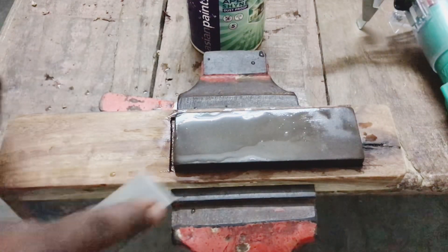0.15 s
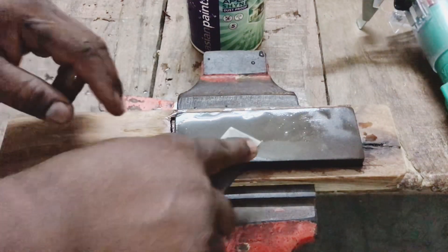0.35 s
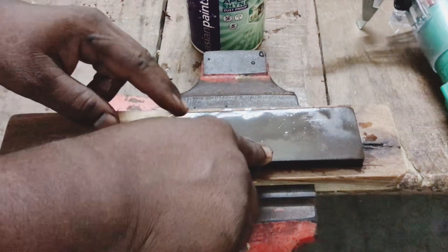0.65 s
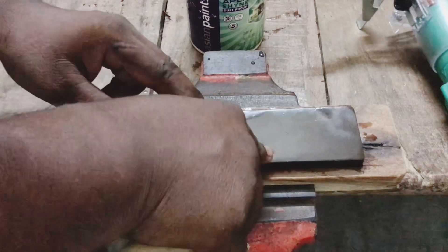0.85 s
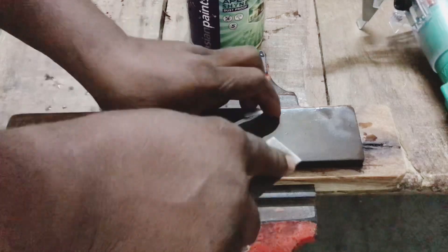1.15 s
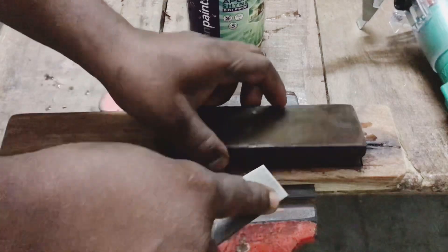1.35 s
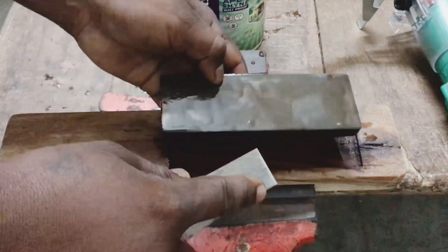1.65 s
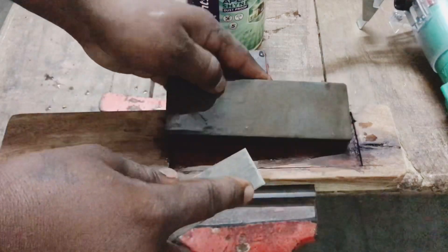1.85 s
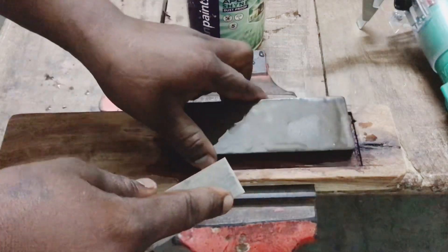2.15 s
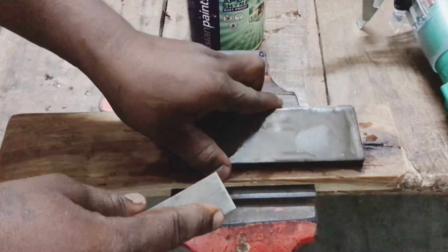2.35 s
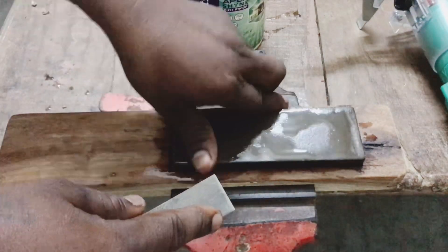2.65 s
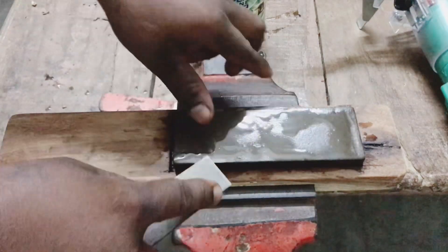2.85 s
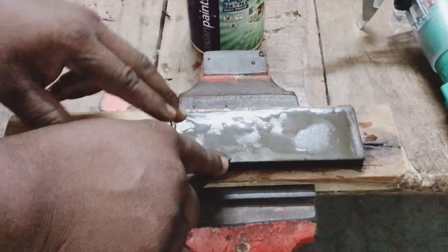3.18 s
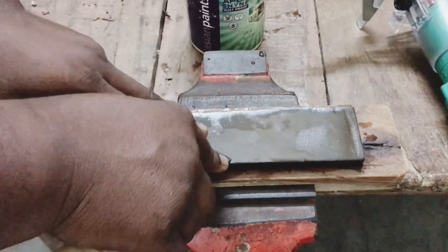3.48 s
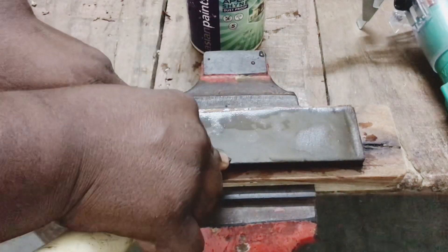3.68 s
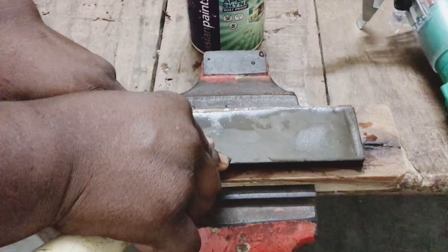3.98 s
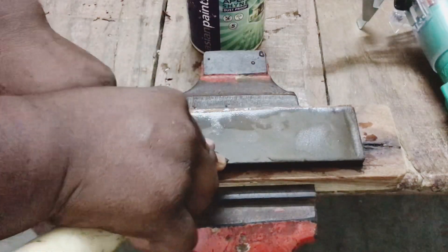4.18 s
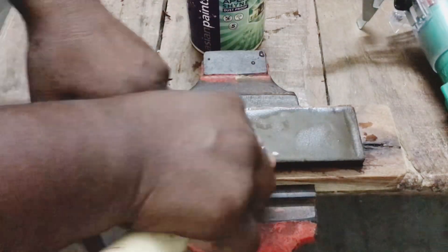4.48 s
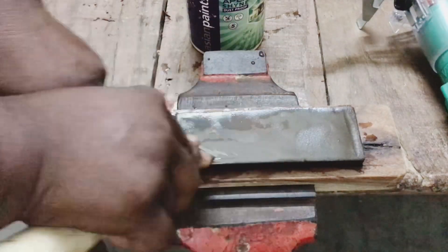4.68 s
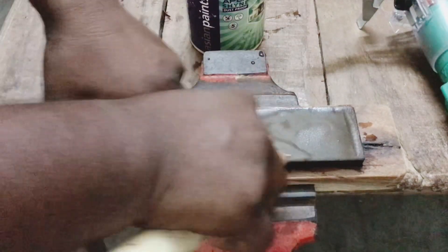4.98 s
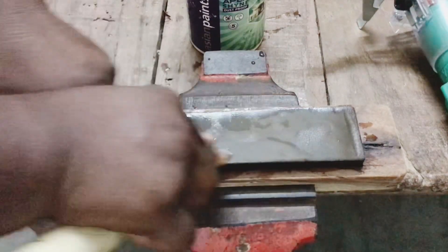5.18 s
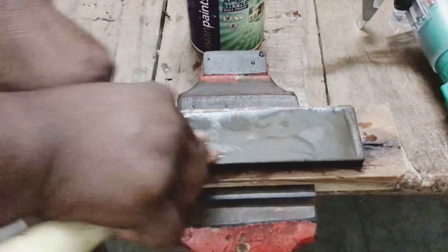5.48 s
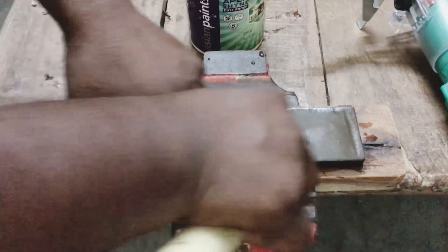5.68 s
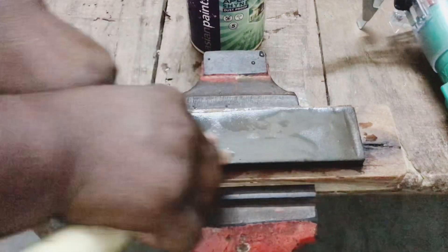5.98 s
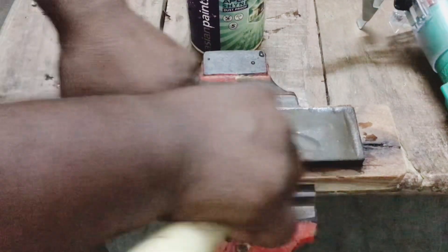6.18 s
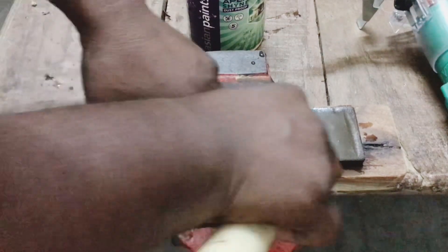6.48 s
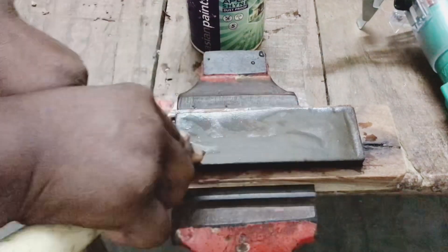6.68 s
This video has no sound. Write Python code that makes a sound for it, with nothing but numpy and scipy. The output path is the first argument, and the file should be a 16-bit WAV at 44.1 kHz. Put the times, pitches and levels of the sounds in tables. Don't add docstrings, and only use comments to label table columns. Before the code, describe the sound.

Wind gusts rumble and pop on a phone microphone while a stone knocks on its wooden holder, then a steel blade rasps in quick strokes.

```python
import sys
import numpy as np
from scipy import signal
from scipy.fft import rfft, irfft, next_fast_len
from scipy.io import wavfile
from scipy.ndimage import uniform_filter1d

SR = 44100
rng = np.random.default_rng(int(sys.argv[2]) if len(sys.argv) > 2 else 0)


def voltage_ratio(level):
    return 10 ** (np.asarray(level, float) / 20)


def bounce(signal):
    frames = np.transpose(np.atleast_2d(signal))
    limited = np.clip(frames, -1, 1)
    pcm = np.round(limited * 32767).astype(np.int16)
    wavfile.write(sys.argv[1], SR, pcm)


N = 301591

# start t/s, length t/s, rumble level/dB, sharper flutter level/dB
GUSTS = [(-.05, 0.15, -38.5, -45.5), (0.022, 0.22, -35, -39.5), (0.174, 0.27, -30.5, -35),
         (0.354, 0.12, -20.5, -33), (0.418, 0.16, -31.5, -42.5), (0.561, 0.17, -34, -57),
         (0.7, 0.25, -35, -35.5), (0.947, 0.25, -29, -37.5), (1.199, 0.21, -31.5, -43),
         (1.39, 0.26, -39, -50.5), (1.584, 0.36, -31, -38), (1.88, 0.27, -27, -31),
         (2.066, 0.28, -35.5, -54), (2.384, 0.33, -35.5, -39.5), (2.634, 0.31, -40, -50),
         (2.898, 0.11, -31.5, -40), (3.006, 0.26, -36.5, -49.5), (3.313, 0.4, -36.5, -56.5),
         (3.66, 0.17, -33.5, -40), (3.885, 0.26, -30.5, -43), (4.137, 0.43, -31, -38.5),
         (4.587, 0.19, -37, -42), (4.842, 0.22, -32, -43.5), (5.003, 0.5, -45, -53.5),
         (5.206, 0.2, -39, -45.5), (5.422, 0.29, -39, -41.5), (5.713, 0.45, -31.5, -39.5),
         (6.251, 0.28, -37.5, -39.5), (6.556, 0.21, -35.5, -65.5), (6.721, 0.15, -36, -48.5)]


def gusts(column, sag_db_s, calm_db):
    rise_s, fall_s = 0.051, 0.091
    t = np.arange(N) / SR
    speed = np.full(N, voltage_ratio(calm_db / 3))
    for start, length, *levels_db in GUSTS:
        db = levels_db[column]
        rise = min(rise_s, length / 2)
        hold = max(length - rise - fall_s, 1e-3)
        top, sagged = voltage_ratio(db / 3), voltage_ratio((db + sag_db_s * hold) / 3)
        times = [start, start + rise, start + min(rise + hold, length - .01), start + length]
        speed = np.maximum(speed, np.interp(t, times, [0, top, sagged, 0]))
    return speed ** 3


# t/s, peak level/dB, f/Hz
POPS = [(0.102, -11, 215), (0.2425, -18.5, 195), (.291, -17, 189), (0.398, -14, 312), (0.422, -16, 236),
        (0.475, -15, 167), (1.0065, -19.5, 195), (1.044, -11, 208), (1.276, -11, 220), (1.311, -17.5, 178),
        (1.934, -14.5, 175), (1.9678, -15.5, 144), (2.035, -15.5, 167), (2.4756, -12.5, 215),
        (2.501, -8.5, 213), (3.0678, -15, 146), (3.418, -20.5, 133.2), (3.725, -20, 174), (3.961, -18, 151),
        (4.189, -22, 208), (4.2525, -14.5, 212), (4.399, -17, 145), (4.95, -21.5, 187.4),
        (5.165, -23.5, 118), (5.3119, -23, 143), (5.535, -13.5, 155), (5.793, -15, 144), (5.853, -9.5, 160),
        (6.3062, -15, 260), (6.3485, -13.5, 196)]
# t/s, peak level/dB, f/Hz, number of cycles
WOBBLES = [(0.227, -23, 139, 1.7), (.412, -8.5, 253, 1.45), (0.7787, -18, 145, 1.74),
           (0.8334, -12, 148, 0.82), (0.9927, -17.5, 158, 1.1), (1.1009, -23.5, 149, 0.65),
           (1.455, -21, 134, 1.6), (1.6821, -11.5, 275, 1.22), (1.7746, -12, 154, 0.95),
           (1.999, -15.5, 179, 3.3), (2.462, -18.5, 154, 1.25), (2.4855, -12, 154, 1.77),
           (2.7073, -11.5, 188, 1.1), (3.1136, -21.5, 135, 1.46), (4.02, -23.5, 164.3, 1.36),
           (4.312, -18.5, 139.8, 1.1), (4.893, -18.5, 145, 1.1), (4.9335, -15, 225, 1.03),
           (2.482, -24, 395, 2.7), (6.303, -22, 329, 0.98), (6.335, -24.5, 270, 1.3),
           (3.548, -32, 255, 1.7), (6.317, -14, 147, 1.86), (3.33, -37, 150, 1.4), (3.398, -36, 197, 1),
           (3.507, -30, 128.3, 1.9), (3.772, -32.5, 230, 1.4), (2.414, -34.5, 197, 2.5)]
# t/s, peak level/dB, f/Hz
PUFFS = [(0.264, -26.5, 218), (0.314, -23, 177), (0.356, -28.5, 149), (0.502, -44, 129), (0.62, -31, 174),
         (0.803, -34, 219), (1.024, -22.5, 172), (1.057, -21.5, 185), (1.249, -37, 165),
         (1.263, -25.5, 163), (1.298, -24, 174), (1.624, -32, 187), (1.648, -35, 166), (1.67, -25, 156),
         (1.708, -22.5, 169), (1.791, -21, 161), (1.81, -24.5, 216), (1.828, -21, 177), (1.846, -25, 169),
         (1.861, -35, 188), (1.955, -19, 210), (1.986, -19, 165), (2.022, -33, 191), (2.048, -30, 145),
         (2.095, -24, 162), (2.196, -25.5, 123), (2.212, -28, 151.7), (2.242, -23, 134), (2.45, -22.5, 130),
         (2.547, -30.5, 143.3), (2.565, -24.5, 197), (2.602, -23.5, 217), (2.675, -24.5, 157),
         (2.766, -27, 167), (2.842, -25, 178), (2.919, -25, 240), (2.952, -25, 133), (3.093, -25.5, 140),
         (3.559, -29.5, 153.7), (3.701, -22, 175), (3.941, -29.5, 166), (3.98, -30, 137),
         (3.998, -31.5, 129), (4.204, -26, 193), (4.361, -25.5, 157), (4.383, -23, 116),
         (4.657, -23.5, 131), (4.678, -28, 145), (4.878, -24, 124), (4.917, -32, 165), (5.27, -25, 195),
         (5.571, -26.5, 170), (5.77, -32.5, 133), (5.823, -28, 177), (5.931, -26.5, 167), (5.959, -24, 218),
         (6.058, -27.5, 147), (6.374, -26.5, 179), (6.417, -25.5, 141.4), (6.784, -27, 148)]


def eddies():
    pops = [(*pop, 0.64) for pop in POPS]
    puffs = [(*puff, 1.124) for puff in PUFFS]
    whirls = [*pops, *WOBBLES, *puffs]
    out, t = np.zeros(N), np.arange(-1200, 1200) / SR
    for (s, db, hz, cycles), turn in zip(whirls, rng.standard_normal(len(whirls))):
        swell = np.exp(-4 * np.log(2) * (hz * t / cycles) ** 2)
        add(out, s + t[0], -voltage_ratio(db) * swell * np.cos(2 * np.pi * hz * t + 0.74 * turn))
    return out


# f/Hz, level/dB
RUMBLE_COLOUR = [(40, -38.5), (60, -18), (80, 3), (110, 4), (170, -3.5), (220, -10), (270, -15.5),
                 (330, -43)]
FLUTTER_COLOUR = [(180, -30), (240, 1.5), (300, 1), (380, -8.5), (470, -18.5), (560, -33)]
SWAY_COLOUR = [(15, 0), (40, -1), (55, -19.5)]
PORT_HISS_COLOUR = [(500, -21), (1500, -0.5), (3000, -2), (5000, -2.5), (7500, -2), (9000, -6.5),
                    (10000, -39.5)]


def wind():
    rumble = gusts(0, sag_db_s=-24, calm_db=-69)
    flutter = gusts(1, sag_db_s=-69.5, calm_db=-70)
    lumps_db = 7.1 * np.tanh(walk(40))
    out = rumble * voltage_ratio(-1.5 + lumps_db) * colour(rng.standard_normal(N), RUMBLE_COLOUR)
    flutter_db = -5.0 + lumps_db + 0.96 * walk(50)
    out += flutter * voltage_ratio(flutter_db) * colour(rng.standard_normal(N), FLUTTER_COLOUR)
    out += eddies()
    rush = uniform_filter1d(out ** 2, size=180) ** 0.61
    out = gate(highpass(out, 66), -61.0, -6.0)
    out += voltage_ratio(-32) * rumble * colour(rng.standard_normal(N), SWAY_COLOUR)
    return out + voltage_ratio(-40.5) * rush * colour(rng.standard_normal(N), PORT_HISS_COLOUR)


# start t/s, length t/s, f/Hz, level/dB
HOWLS = [(.089, 0.028, 554, -46.5), (.392, 0.061, 720, -50.5), (.404, 0.018, 1033, -53.5),
         (1.678, 0.018, 617, -39.5), (2.475, 0.029, 575, -39), (2.702, 0.015, 594, -63.5),
         (6.298, 0.027, 650, -46), (6.32, 0.052, 597, -52.5), (6.31, 0.066, 754, -59.5)]


def howls():
    return noisy_tones(HOWLS, width_hz=160)


# f/Hz, level/dB
CRACK_COLOUR = [(500, -29), (1500, 0), (6000, -1.5), (9500, -11), (10500, -34)]


def knocks(blows, body):
    modes, tail, tail_db, t60, longer, rise_ms = body
    out, t = np.zeros(N), np.arange(16384) / SR
    for s, db, contact_ms, gate_s, crack_db in blows:
        waver = rng.standard_normal((2, len(modes), len(t)))
        waver = uniform_filter1d(uniform_filter1d(waver, size=600), size=600)
        waver *= np.sqrt(600) * np.minimum(t / .03, 1)
        y = np.zeros(len(t))
        for (hz, mode_db, ring_s), level_waver, phase_waver in zip(modes, *waver):
            level_luck, pitch_luck = rng.standard_normal(2)
            phase = 2 * np.pi * hz * (1 + 0.00364 * pitch_luck) * t + phase_waver
            y += voltage_ratio(mode_db + 1.66 * level_luck + 2.8 * level_waver) * np.sin(phase) * 1000 ** (-t / ring_s)
        y = y * (0.67 + 0.87 * np.exp(-t / 0.0063)) / np.max(np.abs(y))
        y /= 1 + np.exp((t - longer * gate_s) / 0.014)
        noise = colour(rng.standard_normal(len(t)), tail)
        dull = uniform_filter1d(noise, size=9)
        echoes = dull * 1000 ** (-t / t60) + (noise - dull) * 1000 ** (-t / (1.35 * t60))
        y += voltage_ratio(tail_db) * echoes / (1 + np.exp((t - gate_s) / 0.0066))
        y += voltage_ratio(0.5) * noise * np.exp(-t / 0.003)
        y *= 1 - np.exp(-(t * 1000 / rise_ms) ** 2)
        crack = colour(rng.standard_normal(len(t)), CRACK_COLOUR)
        y += voltage_ratio(crack_db) * crack * np.exp(-t / 0.00059)
        y = highpass(y, tail[0][0])
        soft = np.exp(-1 / (contact_ms * SR / 1000))
        add(out, s, voltage_ratio(db) * signal.lfilter([1 - soft], [1, -soft], y))
        smear = noise[-1000:] * np.exp(-t[1000:0:-1] / .005)
        add(out, s - 1000 / SR, voltage_ratio(db + tail_db - 10) * smear)
    return out


# t/s, peak level/dB, contact t/ms, gate closes after t/s, crack level/dB
DROP = [
    (1.782, -40, 0.15, 0.026, -40),
    (1.7986, -10.5, 0.074, 0.15, -4),
]
SEAT = [
    (2.132, -17, 0.065, 0.046, -32.5),
    (2.143, -16, 0.037, 0.24, -15),
    (2.198, -22, 0.024, 0.19, -25),
    (2.306, -13, 0.074, 0.11, -28),
    (2.320, -15, 0.073, 0.16, -19),
]
# modes (f/Hz, level/dB, time to fall 60 dB t/s), colour of the room tail (f/Hz, level/dB),
# tail level/dB, tail time to fall 60 dB t/s, how much longer the gate passes the modes, rise t/ms
DROP_BODY = ([(480, -8, 0.41), (581, -12, 0.46), (780, -14, 0.65), (714, -0.5, 0.58), (1070, -20.5, 0.45),
             (1127, -7.5, 0.2), (1272, -10, 0.31), (1496, -16, 0.29), (1740, -10.5, 0.51), (1852, -16, .35),
             (3900, -14.5, 0.2), (2680, -21, 0.47), (3010, -6, 0.28), (5250, -12.5, 0.14)], [(330, -48),
             (450, -12), (710, -8.5), (920, -16), (1700, -11), (2800, -23), (3800, -24), (8900, -29),
             (10500, -64)], -14.5, 0.43, 1.9, 0.17)
SEAT_BODY = ([(501, -7.5, 0.3), (688, -3, 0.6), (738, -5, 0.85), (1000, -7.5, .2), (1165, -4, 0.21),
             (1515, -7, 0.33), (1286, -9.5, .18), (1418, -3, 0.32), (1600, -7.5, 0.2), (1752, 3, 0.5),
             (1920, 0.5, 0.22), (2130, -13.5, 0.2), (2230, -6, 0.25), (2425, -17.5, 0.25)], [(380, -40),
             (480, -10.5), (720, -4.5), (900, -20), (1750, 2.5), (2450, -11), (2750, -25), (9300, -24.5),
             (10500, -84.5)], -15.5, 0.31, 1.8, .7)


def stone_on_holder():
    return knocks(DROP, DROP_BODY) + knocks(SEAT, SEAT_BODY)


# t/s, peak level/dB, contact t/ms, gate closes after t/s, crack level/dB
TAP_FIRST = [
    (.674, -49, .1, .02, -50),
    (.688, -29.5, 0.089, 0.11, -42),
]
TAP_SECOND = [
    (3.255, -46, 0.12, 0.018, -50),
    (3.2649, -29.5, 0.033, 0.084, -10),
]
TAP_FIRST_BODY = ([(1114, 5.5, 0.32), (1304, -2, .18), (3220, -5, 0.3), (3300, -11.5, 0.25),
                  (3550, -8.5, .2), (4800, -12, .22), (4790, -13, 0.2), (1190, -13, 0.1)], [(900, -54),
                  (1110, 3.5), (1330, -2), (1600, -53), (2970, -32), (3320, -9.5), (3760, -33), (8100, -25),
                  (10500, -75)], -5, 0.13, 1.15, 2)
TAP_SECOND_BODY = ([(1136, 7.5, 0.15), (1440, -5, 0.086), (3190, -7.5, 0.52), (3510, -6, .6),
                   (3730, -8, 0.35), (3830, -6, .3), (4300, -12, 0.5), (4600, -7.5, .2), (5146, -19, .12),
                   (6070, -7, 0.42), (6900, -5, .4), (7030, -5, 0.2), (9460, -15, 0.2)], [(900, -53),
                   (1080, -4.5), (1280, -22.5), (2650, -27.5), (3400, -4), (4050, -12), (4600, -9),
                   (5300, -9.5), (7000, -13), (8000, -25.5), (9190, -13.5), (10500, -43)],
                   -11.5, 0.27, 1.35, 0.41)


def chisel_taps():
    return knocks(TAP_FIRST, TAP_FIRST_BODY) + knocks(TAP_SECOND, TAP_SECOND_BODY)


# start t/s,
# length t/s, f/Hz, level/dB
AFTER_RINGS = [(.345, 0.042, 3940, -72.5), (1.94, 0.074, 865, -50.5), (1.95, 0.078, 610, -45),
               (2.14, 0.097, 2990, -52.5), (2.192, 0.017, 2350, -46), (2.21, 0.078, 2320, -49.5),
               (2.37, 0.073, 2330, -57.5), (3.33, 0.076, 4500, -80), (3.36, 0.053, 3410, -77)]


def after_rings():
    return noisy_tones(AFTER_RINGS, width_hz=210)


# bite t/s, halt t/s, gate shuts t/s
STROKES = [(4.44, 4.575, 4.635), (4.66, 4.78, 4.84), (4.86, 4.98, 5.003), (5.064, 5.175, 5.24),
           (5.255, 5.385, 5.405), (5.47, 5.585, 5.6), (5.66, 5.79, 5.805), (5.885, 5.98, 5.994),
           (6.06, 6.165, 6.192), (6.275, 6.37, 6.39), (6.44, 6.558, 6.576), (6.663, 6.752, 6.768)]
# at bite level/dB, midway level/dB, at halt level/dB
PRESSURE = [(-43.5, -40, -42), (-44, -40, -40.5), (-37.5, -38, -42.5), (-43, -38, -41), (-38.5, -36, -41),
            (-45, -39, -42), (-41.5, -39.5, -43), (-45.5, -40.5, -45.5), (-45, -41.5, -45.5),
            (-46, -46, -45.5), (-46, -40.5, -42), (-46, -43.5, -48.5)]
# low mode level/dB, high shoulders level/dB
GRIP = [(1.5, -3.5), (0.5, -1.5), (2.5, -3), (1.5, 0), (-2, -8), (4.5, 0.5), (-6, -2), (-14.5, 3), (-12, 0),
        (0, -0.5), (-6.5, 0), (2, 3)]
# f/Hz, width f/Hz, level/dB, gain along a pull level/dB, along a push level/dB,
# share of the grip's low mode, share of its shoulders
BLADE = [(6130, 520, -15.5, 3, 4.5, 0.93, 0), (6570, 500, -9.5, 1.5, -1.5, 0, 0.064),
         (6860, 400, -10, -2, 0, 0, 0.062), (7250, 450, -14, -4.5, 5, 0.091, 1),
         (8000, 900, -25.5, -1, 9, 0.48, 0.051), (8730, 400, -18, -4.5, 1, 0.05, 0.99),
         (9194, 640, -13, 0.5, -0.5, 0, 0.084), (9730, 740, -23, 2.5, 1, 0.24, 0)]
# t/s, gain level/dB
CATCHES = [(4.483, 2.5), (4.51, 3), (4.558, 6), (4.685, 3.5), (4.701, 5), (4.727, 4.5), (4.742, 6),
           (4.755, 5.5), (4.944, 6), (5.265, 8), (5.276, 5.5), (5.311, 5.5), (5.319, 4.5), (5.557, 7),
           (5.664, 3.5), (5.719, 1.5), (5.732, 5), (5.916, 4), (6.068, 4.5), (6.113, 5.5), (6.147, 4.5),
           (6.275, 5.5), (6.466, 6), (6.512, 6), (6.682, 9)]
# f/Hz, level/dB
SCRAPE_COLOUR = [(350, -24.5), (500, -9.5), (1400, -9), (3400, -9.5), (5500, -10), (8000, -32.5),
                 (10000, -34.5), (10600, -52)]


def strokes():
    t, ringing, scraping = np.arange(N) / SR, np.zeros(N), np.zeros(N)
    for (bite, halt, shut), (bite_db, mid_db, halt_db) in zip(STROKES, PRESSURE):
        times = [bite - .06, bite - .012, bite, (bite + halt) / 2, halt,
                 min(halt + .018, shut - 2e-3), shut, shut + .013]
        levels_db = [-92, bite_db - 13.0, bite_db, mid_db, halt_db, halt_db - 11, halt_db - 16.5, -80]
        press = voltage_ratio(np.interp(t, times, levels_db, -120, -120))
        ringing += press
        scraping += voltage_ratio(-19.5) * press * np.clip((halt + 0.12 - t) / 0.025, 0, 1)
    catch_s = 0.00093
    catch_db = sum(db * np.exp(-((t - s) / catch_s) ** 2 / 2) for s, db in CATCHES)
    grains = rng.standard_normal(N) * voltage_ratio(1.8 * walk(400) + 0.5 * walk(70) + 1.4 * catch_db)
    ends = np.array(STROKES)[:, :2].ravel()
    pull = np.interp(t, ends, np.tile([-.5, .5, 0, 0], len(STROKES) // 2))
    push = np.interp(t, ends, np.tile([0, 0, -.5, .5], len(STROKES) // 2))
    low_db, shoulder_db = [np.interp(t, ends, np.repeat(db, 2)) for db in np.transpose(GRIP)]
    blade = np.zeros(N)
    for hz, width, db, pull_db, push_db, low, shoulder in BLADE:
        mode_db = db + pull_db * pull + push_db * push + low * low_db + shoulder * shoulder_db
        blade += voltage_ratio(mode_db + 1.5 * walk(10)) * ring(grains, [(hz, width, 0)])
    return gate(ringing * blade, -64.5, -6.0) + scraping * colour(grains, SCRAPE_COLOUR)


# t/s, peak level/dB
GRIT = [(5.23, -47), (5.275, -37), (5.331, -41), (5.392, -35), (5.749, -42), (5.857, -49), (5.949, -37)]


def grit_ticks():
    ticks, n = np.zeros(N), np.arange(60)
    for s, db in GRIT:
        add(ticks, s, voltage_ratio(db) * rng.standard_normal(60) * np.exp(-n / 49.0))
    modes = [mode[:3] for mode in BLADE] + [(4000, 8300, -27.5)]
    return 1.1 * np.std(ticks) * ring(ticks, modes)


# start t/s, length t/s, f/Hz, level/dB
BLADE_SINGS = [(4.305, 0.058, 7060, -76), (4.475, 0.12, 5280, -53), (4.477, 0.095, 4220, -55.5),
               (4.7, 0.1, 4200, -64), (4.71, 0.072, 5400, -53), (4.9, 0.053, 4300, -62.5),
               (4.901, .09, 5300, -64), (5.1, 0.078, 5800, -56), (5.19, .05, 6100, -60.5),
               (5.37, 0.028, 5400, -61), (5.753, 0.04, 5370, -61), (5.845, 0.052, 6770, -60),
               (5.85, 0.046, 9200, -64.5), (6.27, 0.06, 5800, -57.5), (6.33, 0.039, 7380, -55),
               (6.52, 0.041, 5400, -52), (6.67, 0.083, 6030, -53.5)]


def blade_sings():
    return noisy_tones(BLADE_SINGS, width_share=0.094)


# start t/s, length t/s, f/Hz, level/dB
SQUEAKS = [(.852, 0.073, 700, -64), (1.035, 0.028, 640, -52), (1.262, 0.077, 578, -52.5),
           (2.04, 0.16, 747, -62), (2.1, 0.03, 1337, -50.5), (2.11, 0.023, 2030, -62),
           (2.11, 0.024, 1100, -56), (2.3, .11, 207.6, -47), (2.925, 0.054, 590, -66.5),
           (3.3, 0.069, 1090, -64.5), (4.442, 0.088, 2165, -58.5), (4.742, 0.046, 2190, -58.5),
           (5.14, 0.063, 466, -58), (5.244, 0.081, 2307, -51), (5.245, 0.18, 2010, -55),
           (5.333, 0.08, 518, -53), (5.389, 0.045, 472, -46.5), (5.514, 0.073, 462, -53.5),
           (5.74, 0.02, 1616, -54), (6.038, 0.076, 2210, -68), (6.137, 0.027, 2210, -58),
           (6.149, 0.041, 1895, -51.5), (6.306, 0.011, 1033, -47), (6.431, 0.067, 2433, -58),
           (6.497, 0.094, 2300, -54), (6.507, 0.062, 1605, -59), (6.521, 0.058, 479, -47),
           (6.544, 0.033, 1070, -62.5)]


def squeaks():
    return noisy_tones(SQUEAKS, width_hz=54, width_share=0.027)


# f/Hz, level/dB
FLOOR_COLOUR = [(20, -8.5), (45, -9), (120, -2.5), (450, -6.5), (1820, -8.5), (2600, -18.5), (5430, -23),
                (7200, -24), (7900, -32), (9600, -32), (10300, -40.5)]


def room():
    drift_s = [0, 1.95, 2.05, 2.5, 3.1, 4.3, 5, 6.84]
    drift_db = np.interp(np.arange(N) / SR, drift_s, [-0.5, 2.5, 3, 2, 1, 2, 3, 3.5])
    breathing_db = 1.2 * walk(12)
    return voltage_ratio(-71.5 + drift_db + breathing_db) * colour(rng.standard_normal(N), FLOOR_COLOUR)


def noisy_tones(table, width_hz=0, width_share=0):
    out = np.zeros(N)
    for s, length, hz, db in table:
        tone = ring(rng.standard_normal(8192), [(hz, width_hz + width_share * hz, 0)])
        tone = tone[:int((length + .02) * SR)]
        add(out, s - .01, voltage_ratio(db) * tone * signal.windows.tukey(len(tone), .45))
    return out


def gate(x, gate_db, depth_db):
    cells = signal.stft(x, nperseg=1024, noverlap=768)[2]
    power = uniform_filter1d(np.abs(cells) ** 2, size=5, axis=0)
    power = uniform_filter1d(power, size=3, axis=1)
    open_share = 1 / (1 + (voltage_ratio(gate_db) ** 2 / (power + 1e-20)) ** 2)
    return signal.istft(cells * voltage_ratio(depth_db * (1 - open_share)), nperseg=1024, noverlap=768)[1][:N]


def highpass(x, hz):
    return signal.sosfilt(signal.butter(6, hz, "high", fs=SR, output="sos"), x)


def colour(x, points):
    hz, db = np.transpose(points)
    size = next_fast_len(len(x), True)
    f = np.maximum(np.fft.rfftfreq(size, 1 / SR), 1)
    gain = voltage_ratio(np.interp(np.log(f), np.log(hz), db, -120, -120))
    y = irfft(rfft(x, size) * gain, size)[:len(x)]
    return y / np.sqrt(np.mean(y ** 2))


def ring(x, modes):
    size = next_fast_len(len(x), True)
    f = np.fft.rfftfreq(size, 1 / SR)
    gain = sum(voltage_ratio(db) / (1 + np.abs(2 * (f - hz) / width) ** 3) for hz, width, db in modes)
    y = irfft(rfft(x, size) * gain, size)[:len(x)]
    return y / np.sqrt(np.mean(y ** 2))


def walk(rate):
    k = int(SR / rate)
    steps = np.repeat(rng.standard_normal(N // k + 1), k)
    return 1.3 * uniform_filter1d(uniform_filter1d(steps, k), k)[:N]


def add(out, s, x):
    i = int(s * SR)
    out[i:i + len(x)] += x[:N - i]


def scene():
    air = wind() + howls()
    rubbing = strokes() + grit_ticks() + blade_sings()
    blows = gate(stone_on_holder() + chisel_taps(), -62.0, -3.5)
    return (air + blows + after_rings() + rubbing + squeaks() + room())[None]


def roll_off(x):
    return signal.sosfilt(signal.butter(12, 10970, fs=SR, output="sos"), x)


def record(dry):
    mix = signal.sosfilt(signal.butter(12, 9900, fs=SR, output="sos"), dry)
    mix = signal.sosfilt(signal.cheby2(8, 30, 10550, fs=SR, output="sos"), mix)
    return roll_off(mix)


dry = scene()
out = record(dry)
bounce(out)
```